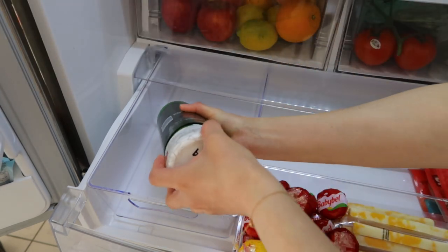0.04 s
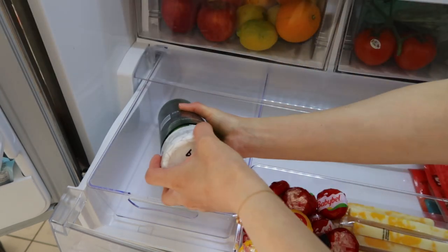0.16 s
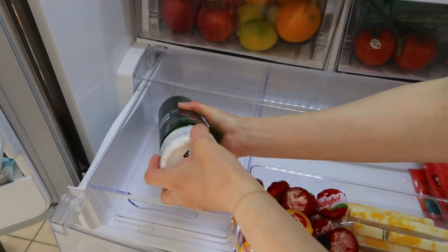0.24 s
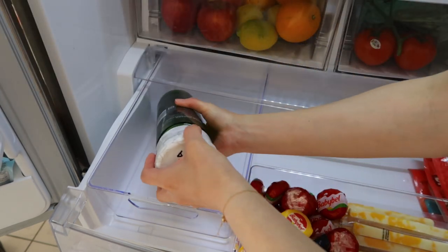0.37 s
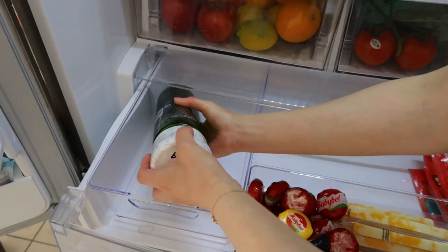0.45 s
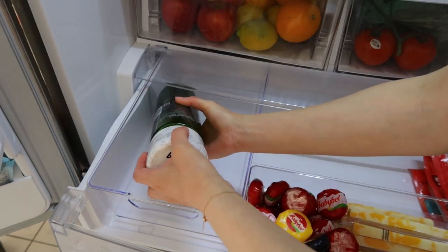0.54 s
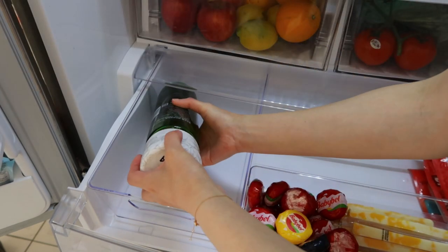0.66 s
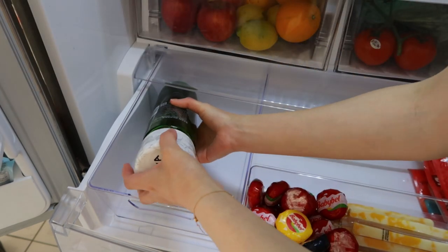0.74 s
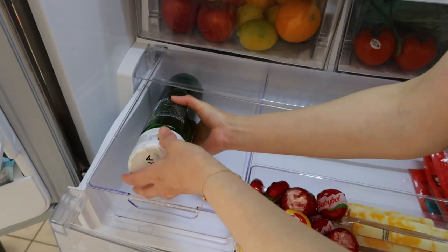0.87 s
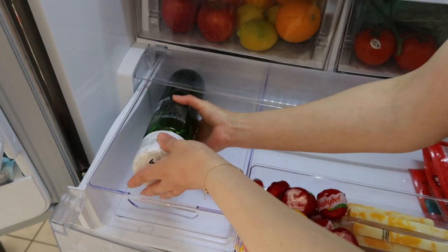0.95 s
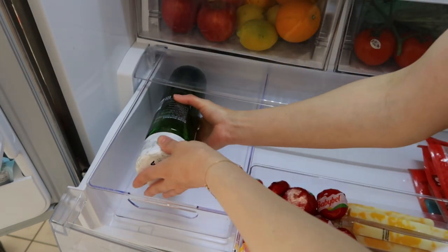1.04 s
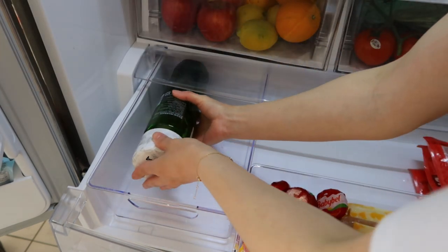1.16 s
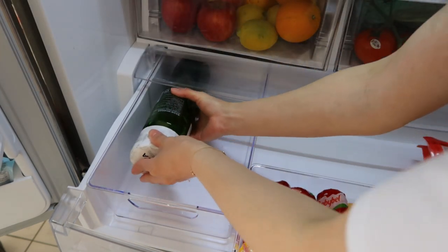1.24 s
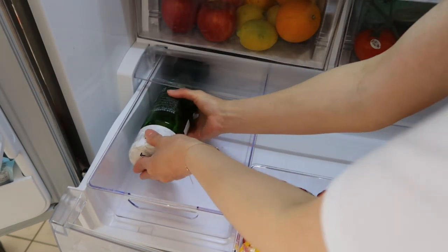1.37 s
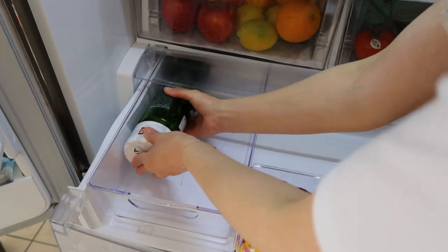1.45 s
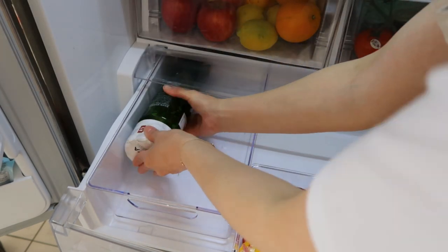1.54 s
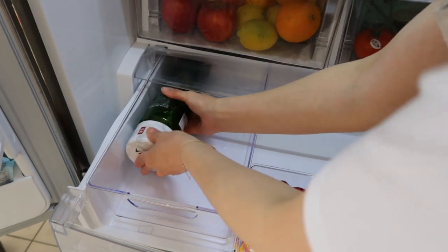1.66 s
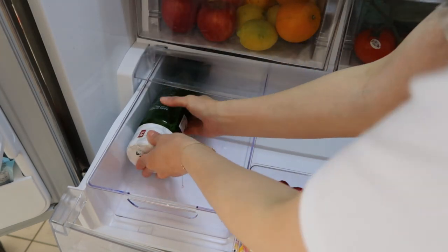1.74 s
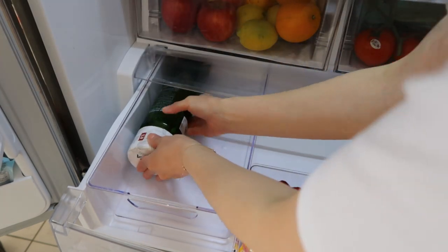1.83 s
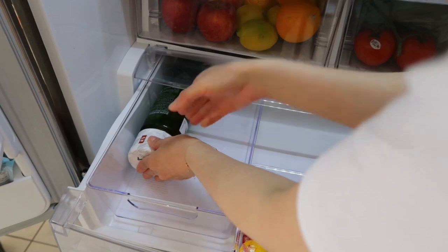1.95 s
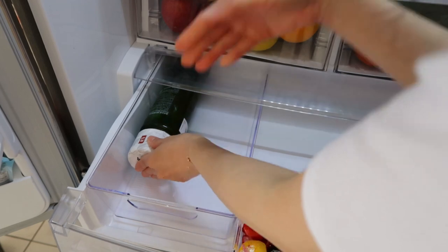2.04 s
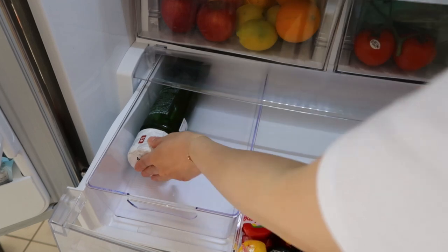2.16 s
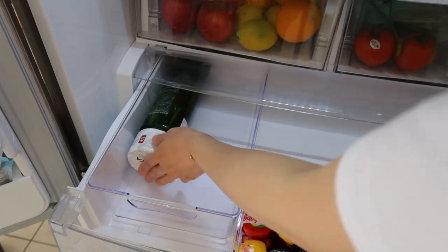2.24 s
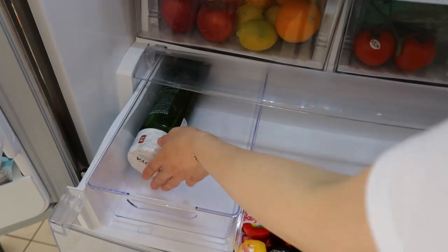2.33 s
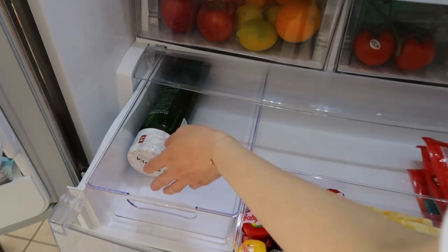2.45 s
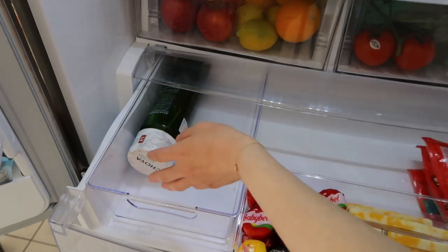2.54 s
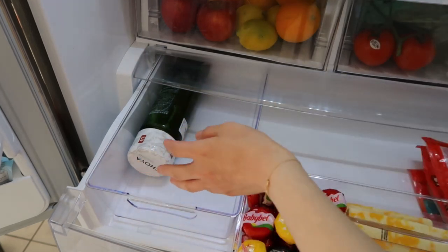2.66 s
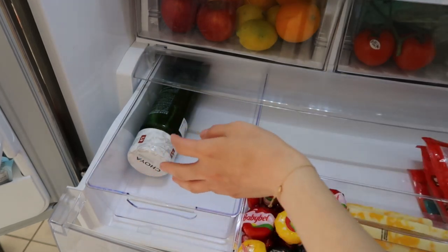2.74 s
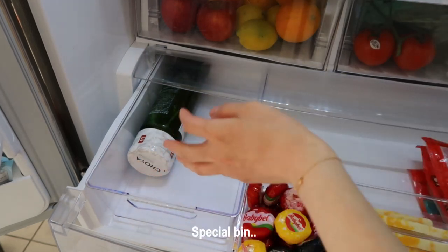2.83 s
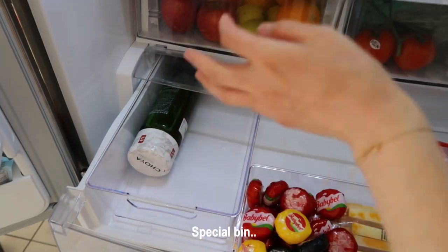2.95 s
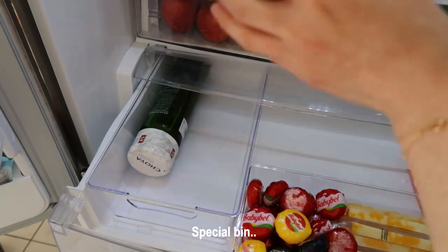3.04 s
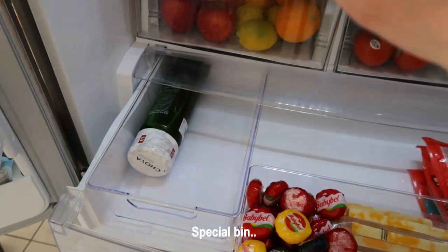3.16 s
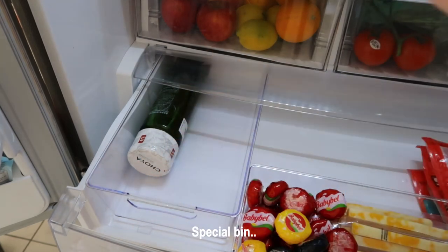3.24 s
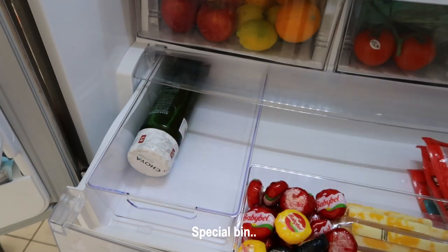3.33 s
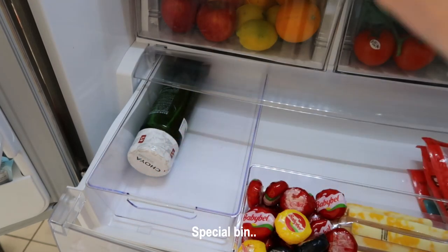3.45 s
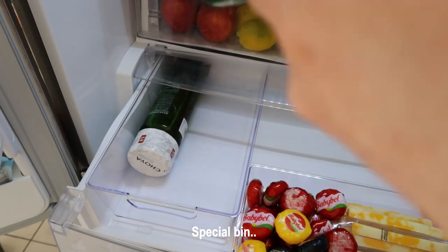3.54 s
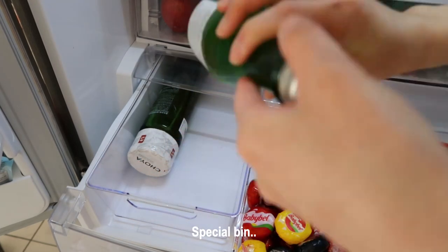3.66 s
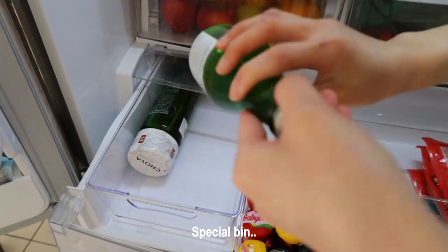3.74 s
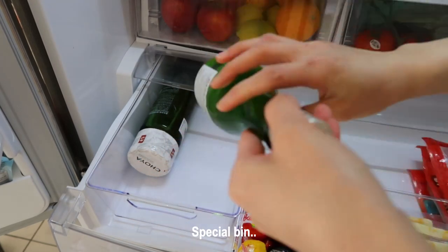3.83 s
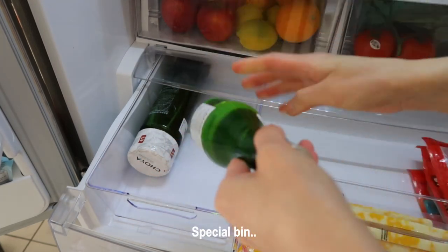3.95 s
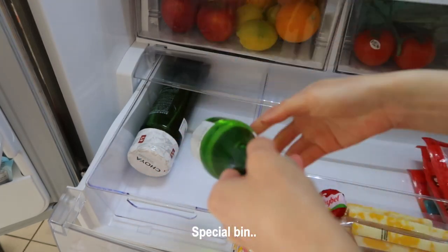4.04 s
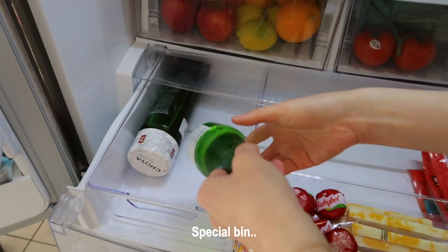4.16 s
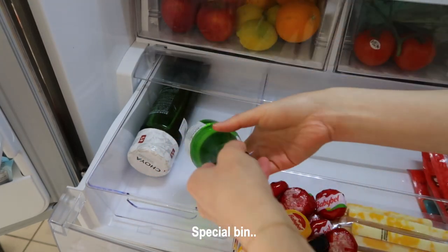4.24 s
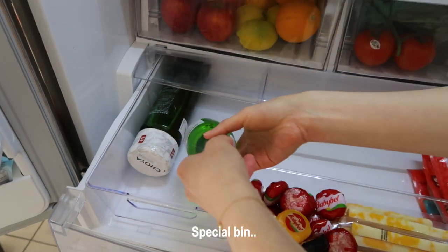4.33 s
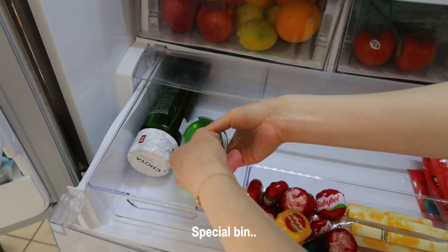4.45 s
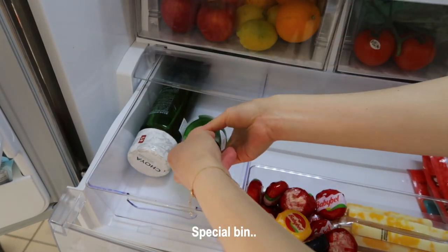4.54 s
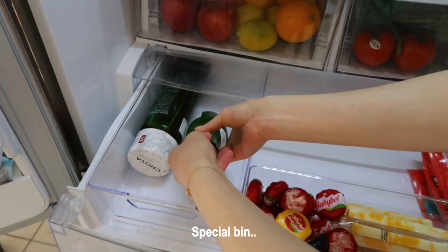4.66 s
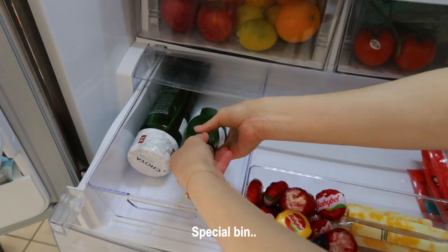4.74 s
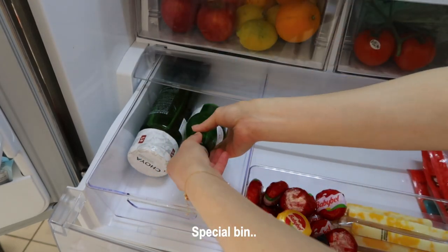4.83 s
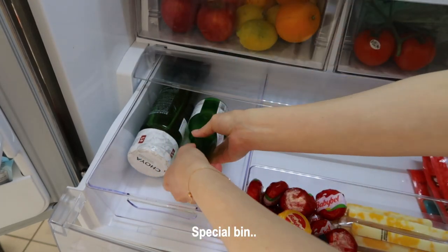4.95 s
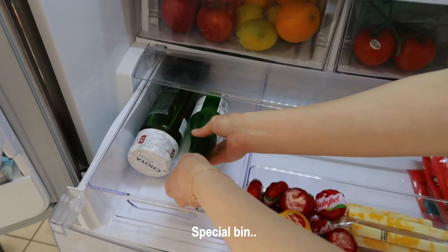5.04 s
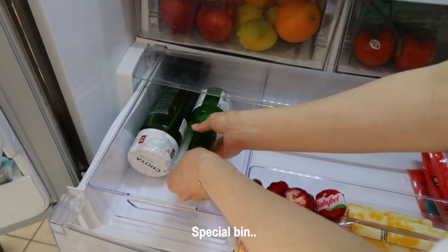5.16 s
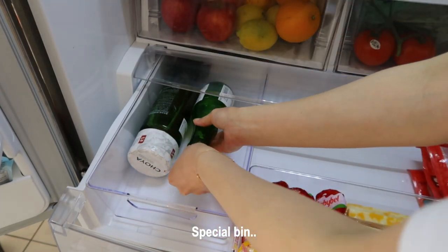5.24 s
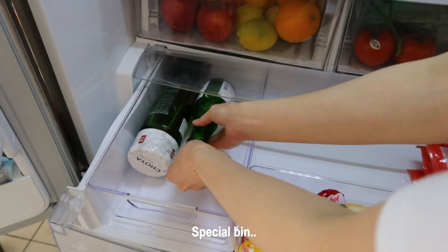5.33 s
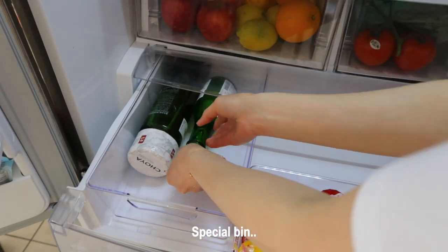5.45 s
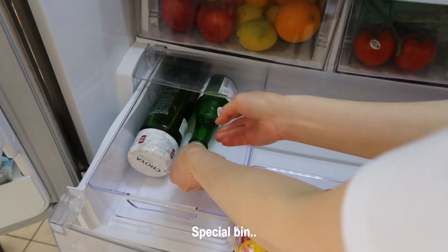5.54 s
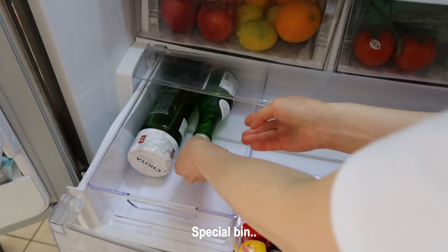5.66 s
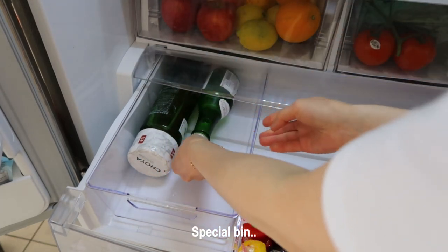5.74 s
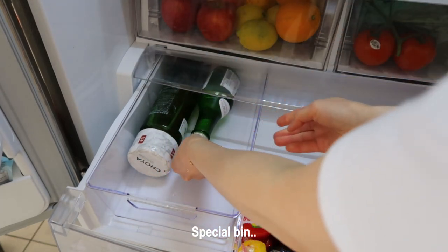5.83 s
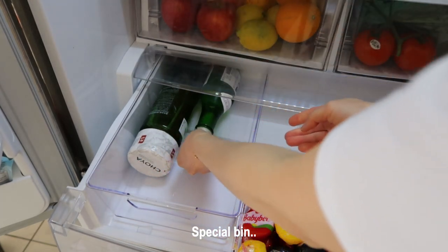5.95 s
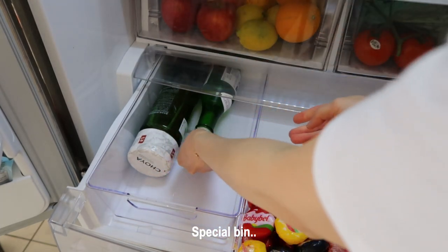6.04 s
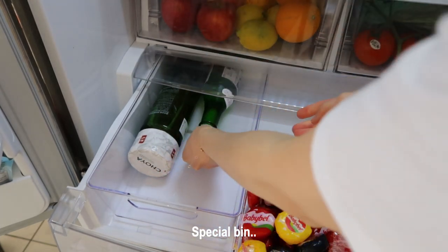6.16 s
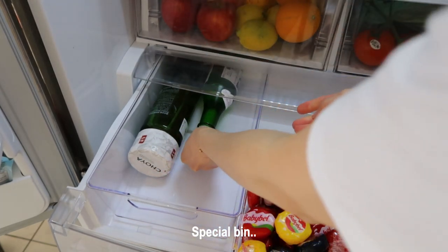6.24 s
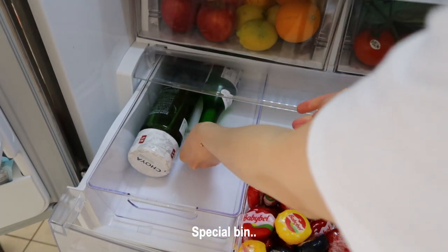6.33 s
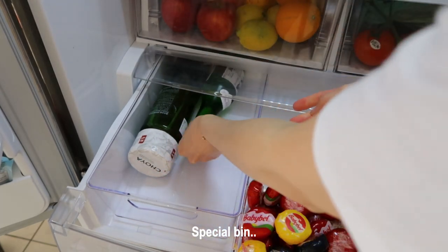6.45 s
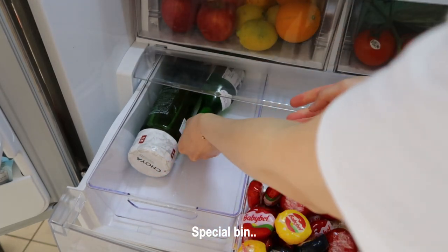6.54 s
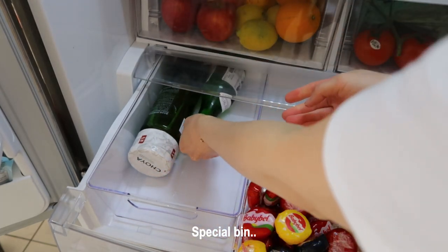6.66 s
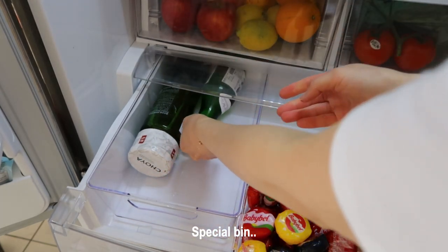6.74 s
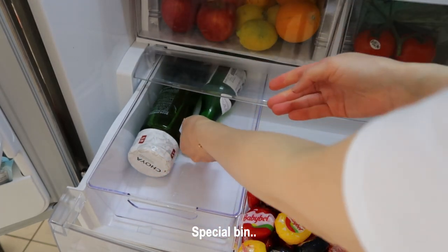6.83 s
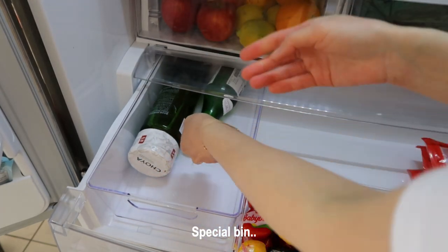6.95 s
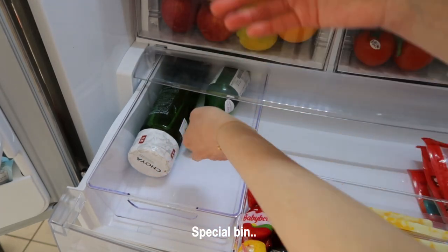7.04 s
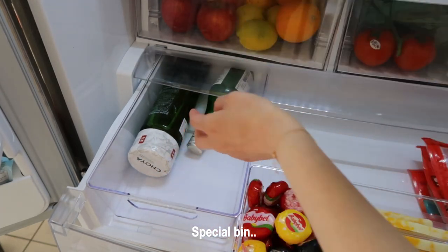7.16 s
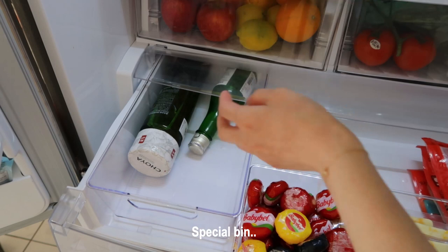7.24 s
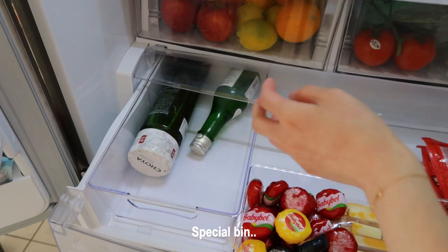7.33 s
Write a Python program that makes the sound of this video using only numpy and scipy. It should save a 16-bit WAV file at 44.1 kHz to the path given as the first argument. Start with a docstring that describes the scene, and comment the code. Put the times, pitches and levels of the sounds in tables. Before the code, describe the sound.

A full glass bottle knocks and chatters into the plastic drawer of an open fridge, settling with sharper hits and a small dry rasp. After a quiet pause, a second bottle lands with a short clank, shifts softly, then knocks firmly and clinks faintly on the first. Low rumble and slight rustling lie under it, with quiet room air. Close stereo microphone, short boxy tail.

```python
"""Two full glass bottles are laid into the plastic drawer of an open fridge, close to a small stereo camera.
From 0.3 s on, chattering knocks excite panel noise, damped drawer modes and a cabinet tail, with short tones.
At 2.5 s a label rasps (random clicks into resonances); at 4.85 s the second bottle lands with a clank of held
tones; at 6.6 s glass clinks on glass (struck modes). Low rumble, mid-band noise and rustling are shaped noise
under it all, as is the kitchen air, which sinks at 6.4 s; a thin, very high sine flickers in level."""
import sys
import numpy as np
from scipy import signal
from scipy.fft import rfft, irfft, next_fast_len
from scipy.io import wavfile
from scipy.ndimage import uniform_filter1d

SR = 44100
rng = np.random.default_rng(int(sys.argv[2]) if len(sys.argv) > 2 else 0)


def digitize_waveform(pressure):
    """Quantize a signal to 16-bit integers and store it at the path in sys.argv[1].

    Rows of a 2-D input are taken as channels; values are limited to [-1, 1].
    """
    field = np.atleast_2d(pressure).T
    bounded = np.clip(field, -1, 1)
    quanta = np.round(bounded * 32767).astype(np.int16)
    wavfile.write(sys.argv[1], SR, quanta)


N = 325899
TIME = np.arange(N) / SR
BANDS = 35 * 2 ** np.arange(0, 8.9, 1 / 2)  # half-octave centres, Hz
TINY = 1e-18  # keeps silent filter tails quick

# Glass on plastic. Each row: start in seconds, level in dB, brightness in dB per octave above the body,
# thump in dB.
KNOCKS = [(0.314, -15, -3.5, -12.5), (0.344, -19, -7.5, -14.0), (0.595, -19.5, -1, -5.5),
          (0.608, -20, -4, -22), (0.699, -20.5, -2.5, -5.5), (0.754, -22.5, -4.0, -5),
          (0.845, -34.5, -5.0, -25.0), (0.871, -22.5, -17.5, -47), (0.909, -44, -3, -2),
          (0.957, -17, -6.5, -15.5), (0.989, -21.5, -7.5, -14), (1.019, -28, -6.5, -5),
          (1.486, -20.5, -2.0, -6.5), (1.569, -11.5, -3.0, -24), (1.589, -13.5, -4.5, -11.5),
          (1.639, -26.5, -3, 1), (1.665, -26, -5.5, -20), (1.704, -18, -6, -3.5), (1.734, -30, -8, 0),
          (1.925, -34.5, -8, -10), (2.055, -13.5, -4.5, -10), (2.521, -62, 3.5, 4.5), (2.53, -44, -3.5, 3),
          (2.542, -33, -1.5, 7), (2.564, -30.5, -13, -19), (2.579, -32.5, -21, 1.5), (2.796, -62, 4, 23),
          (4.728, -43, -11, 5), (4.853, -13, -3.5, -13.5), (5.104, -44, -5.5, -2), (5.149, -44, -9, 1),
          (5.392, -44, -6.5, -23), (5.434, -28, -18.5, -14), (5.508, -40, -10.5, 0), (5.687, -28, -13, -14),
          (5.709, -33, -9.5, -8), (5.794, -33, -9.5, -2), (6.251, -9.5, -3.5, -8), (6.309, -16.5, -19, -18),
          (6.601, -26, -7, -44), (6.619, -25, -11.5, -14), (6.819, -10.5, -4, -18),
          (6.885, -18, -6.5, -13.5), (6.929, -27.5, -7, -10), (7.257, -51, -3, -12), (7.371, -45, -7, 7)]
# Spectrum of the knocks. Each row: frequency in Hz, relative level in dB per band.
KNOCK_COLOUR = [(45, -35), (80, -15.5), (160, -3.5), (320, -6.5), (640, 1), (1300, 0), (2600, 5.5),
                (5000, 1), (8000, -7.5), (12000, -4)]
# Decay of the drawer panels. Each row: frequency in Hz, time to fall 60 dB in seconds.
PANEL_T60 = [(60, 0.15), (160, 0.34), (420, 0.14), (1100, 0.16), (2900, 0.097), (7700, 0.088),
             (14000, 0.05)]
# Decay inside the cabinet. Each row: frequency in Hz, time to fall 60 dB in seconds.
CABINET_T60 = [(60, 0.24), (160, 0.47), (420, 0.6), (1100, 0.62), (2900, 0.46), (7700, .3)]
# Clear modes of the drawer. Each row: frequency in Hz, relative level in dB, time to fall 60 dB in seconds.
DRAWER_MODES = [(76.2, -2, 0.53), (96.6, 5, 0.26), (168.7, -6.5, 0.39), (222.8, -4, 0.42),
                (371.4, -0.5, 0.31), (425.7, -0.5, 0.16), (554, -0.5, 0.17), (658, -1.5, 0.25),
                (798, -4.5, 0.091), (883, -6.5, 0.26), (1016, -5.5, 0.103), (1155, 0, 0.15),
                (1556, 8, 0.095), (1806, -19.5, 0.063), (2397, 13, 0.018), (2810, -19.5, 0.16),
                (3140, 9, 0.065)]
# Single short tones, from low hums to very high, faint ticks. Each row: start in seconds, level in dB,
# frequency in Hz, held time in seconds.
SHORT_TONES = [(.318, -19.5, 560, 0.015), (0.358, -32.5, 75.2, 0.1), (.6, -15.5, 546, 0.025),
               (.6, -25.5, 390, 0.032), (.66, -34, 78.8, 0.068), (.755, -25.5, 649, .026),
               (1.05, -35, 197, 0.056), (1.087, -40, 1570, 0.005), (1.087, -43.5, 2880, .008),
               (1.088, -53, 4200, .008), (1.101, -44, 76, 0.11), (1.49, -25, 409, 0.036),
               (1.501, -30.5, 79, 0.14), (1.572, -17, 409, 0.02), (1.706, -20.5, 2020, 0.01),
               (1.719, -33, 95.4, 0.039), (2.057, -19.5, 2440, 0.0055), (2.057, -17.5, 520, 0.0059),
               (2.085, -34.5, 96, 0.058), (2.577, -31.5, 150, 0.0059), (3.465, -58, 3540, 0.016),
               (3.564, -55, 4600, 0.0097), (3.635, -60, 3680, .014), (4.857, -19, 600, 0.0053),
               (5.141, -43, 110, 0.032), (5.462, -30.5, 1040, 0.019), (5.594, -28.5, 658, 0.022),
               (5.962, -50.5, 10300, 0.0073), (5.962, -53, 11100, .008), (5.991, -37, 92.4, 0.067),
               (6.254, -20.5, 432, 0.02), (6.256, -20.5, 225, 0.027), (6.615, -28, 684, 0.0071),
               (6.821, -21, 510, .007), (6.822, -20, 2285, 0.0064), (7.372, -46.5, 600, .018)]
# Tones of the second bottle as it lands. Each row: frequency in Hz, level in dB, after-ring in dB re the tone.
CLANK = [(1502, -13, -23), (1440, -23.5, -17), (4600, -48, -7)]
# Glass on glass. Each row: start in seconds, level in dB.
CLINKS = [(6.601, -37.5)]
# Modes of a bottle wall. Each row: frequency in Hz, relative level in dB, time to fall 60 dB in seconds.
BOTTLE_MODES = [(1490, 1, 0.26), (2430, -16, 0.094), (2850, -8, 0.11), (3620, -6, .2), (3640, -10, 0.19),
                (4000, -11, 0.33), (4620, -4, 0.087), (4700, -13, 0.17), (5600, -9, 0.054),
                (6960, -14, 0.048)]
# Resonances of the rasp. Each row: frequency in Hz, relative level in dB, time to fall 60 dB in seconds.
RASP_MODES = [(2780, -12, .006), (3550, 0, 0.0082), (4600, -3.5, 0.0069), (6460, -14, .004)]
# Low rumble and mid-band noise under the knocks, swelling after several of them. Each row: time in seconds,
# rumble in dB, mid-band noise in dB, both before colouring.
UNDER_NOISE = [(0, -52.5, -55), (.33, -55, -55), (.51, -39.5, -44), (.9, -47, -41), (1.25, -52.5, -48),
               (1.58, -48, -55), (1.67, -50, -25), (1.75, -46.5, -51.5), (2.32, -49.5, -56),
               (3.38, -56.5, -55.5), (4.75, -63.5, -58.5), (4.98, -47, -47.5), (5.5, -55, -49.5),
               (6.0, -48, -53.5), (6.25, -53, -50), (6.4, -54, -43), (6.55, -51, -56), (6.95, -51.5, -59),
               (7.1, -71, -63)]
# Spectrum of rumble, mid-band noise and rustle. Each row: frequency in Hz, relative level in dB per band.
UNDER_COLOUR = [(35, -25), (80, -8.5), (250, -18.5), (500, -11), (1500, -19.5), (3000, -9.5), (7000, -20.5),
                (12000, -18)]
# Skin and sleeve rustling. Each row: start of the hold in seconds, held time in seconds,
# level in dB before colouring.
RUSTLE = [(1.62, 0.067, -52), (2.78, .27, -57.5), (5.97, .24, -64)]
# Spectrum of the room air. Each row: frequency in Hz, relative level in dB per Hz.
ROOM = [(25, 13), (40, 5), (70, -16.5), (100, -8.5), (180, -4), (290, -11), (440, -11.5), (750, -23),
        (1400, -19), (3200, -22.5), (6000, -29.5), (9000, -34), (13000, -41)]
# Stereo width of sounds from the drawer. Each row: frequency in Hz, side minus mid in dB.
NEAR_WIDTH = [(60, -28.5), (110, -57), (200, -62), (380, -21), (700, -25.5), (1290, -14.5), (2380, -13.5),
              (4400, -7), (8120, 1), (15000, 3.5)]
# Stereo width of sounds from all around. Each row: frequency in Hz, side minus mid in dB.
FAR_WIDTH = [(60, -15), (110, -19.5), (200, -3), (380, 3), (700, 7), (1290, 5), (2380, -0.5), (4400, 3.5),
             (8120, -2.5), (15000, 16)]

CHATTER_S, CHATTER_FALL_DB = 0.016, -14  # span of the re-contacts and their fall over it
LEAD_DB = 2.5  # the first contact stands out from the chatter
THUMP_HZ, BODY_HZ, CRACK_HZ = 104.5, 521, 7740  # brightness tilts the bands from body to crack
SNAP_DB, HARDNESS = 0, 0.41  # a heavier blow is a harder contact: dB of snap per dB of blow
BURST_DB, BURST_T60_S = 1.5, 0.026  # the first instant of a knock is louder and dies fast
RATTLE_DB = 1.5  # unevenness of the panel decay
CABINET_DB = -14.5

AFTER_DB = -14.5  # after-ring relative to its tone
AFTER_T60_S, AFTER_SLOPE = 0.27, -0.56  # at the body pitch; shorter for higher tones by this power
DAMP_CYCLES, DAMP_S = 2.6, 0.0027  # both add to the time in which a held tone is damped
WAVER, CLANK_WAVER = 0.14, 0.092  # share by which a held tone wavers
CLANK_S, CLANK_HELD_S, CLANK_T60_S, CLANK_DAMP_S = 4.852, 0.056, 0.62, 0.0037

RASP_S, RASP_HELD_S, RASP_EDGE_S, RASP_DB = 2.535, 0.033, 0.018, -39.5
RUSTLE_RISE_S, RUSTLE_FALL_S, RUSTLE_REST_DB = 0.023, 0.044, -70.5

ROOM_DB = -51.5  # air rms, before the sinking and the low-pass
HIGH_TONE_HZ, HIGH_TONE_DB = 13020, -73.5
SINK_S, SINK_LENGTH_S, SINK_DB = 6.4, 0.12, -5  # the air sinks towards the end
AIR_TOP_HZ = 13200
BASS_HZ, DROOP_HZ, TOP_HZ = 37.0, 12100, 15800
SQUASH = 0.6


def knocks(near):
    """Impact excitation: panel vibration, contact snap and cabinet tail by band, plus the drawer's modes."""
    places, share = chatter()
    _, level, brightness, thump = np.array(KNOCKS).T
    hardness = undb(SNAP_DB + HARDNESS * level[:, None]) ** 2
    out = 0
    for hz, noise in zip(BANDS, near):
        power = blow_power(hz, 0.59 * share, places)
        # powers decay twice as fast as amplitudes
        burst = undb(BURST_DB) ** 2 * fade(power, BURST_T60_S / 2)
        panel = fade(power, on_log(PANEL_T60, hz) / 2) + burst
        # the tail builds up as the panels radiate
        tail = fade(power, on_log(CABINET_T60, hz) / 2) - fade(power, 0.051)
        total = panel + undb(CABINET_DB) ** 2 * np.abs(tail)
        rise = int(0.6 * SR / hz + 0.00076 * SR)  # lows come late
        envelope = np.sqrt(uniform_filter1d(total, rise, origin=(rise - 1) // 2).clip(0))
        vibration = undb(-7.0) * flicker(count=90, db=RATTLE_DB) * envelope * noise
        contact = np.sqrt(blow_power(hz, hardness * share, places))
        snap = mode(contact, hz, 11.0 / hz)  # falls 60 dB in 11 cycles
        out = out + undb(on_log(KNOCK_COLOUR, hz)) * (vibration + snap)
    for hz, db, t60 in DRAWER_MODES:
        # each contact point reaches the mode with its own strength and sign
        reach = rng.standard_normal(share.shape)
        push = blow_power(hz, reach * share, places)
        force = np.sign(push) * np.sqrt(np.abs(push))
        out = out + undb(db - 9.0) * mode(force, hz, t60)
    return out


def chatter(count=6):
    """Repeated impact: a blow and quick, on average weaker re-contacts, as sample places and power shares."""
    starts = np.array(KNOCKS)[:, :1]
    luck = rng.random((len(KNOCKS), 2 * count))
    order = np.arange(count)
    steps = (order + luck[:, :count] * (order > 0)) / count
    places = ((starts + CHATTER_S * steps) * SR).astype(int)
    fall_db = CHATTER_FALL_DB * steps + LEAD_DB * (steps == 0)
    share = (0.22 + luck[:, count:]) * undb(2 * fall_db)  # doubled dB: a power
    return np.clip(places, 0, N - 1), share / share.sum(axis=1, keepdims=True)


def blow_power(hz, weight, places):
    """Spectral tilt of an impact: weighted contact powers at one frequency, placed along time."""
    _, level, brightness, thump = np.array(KNOCKS).T
    octaves = np.log2(np.clip(hz, THUMP_HZ, CRACK_HZ) / BODY_HZ)
    if octaves > 0:
        db = level + brightness * octaves
    else:
        db = level + thump * octaves / np.log2(THUMP_HZ / BODY_HZ)
    power = weight * undb(db)[:, None] ** 2
    return np.bincount(places.ravel(), power.ravel(), N)


def short_tones():
    """Decay that shortens with frequency: the after-rings of low tones outlast those of high ones."""
    out = 0
    for s, db, hz, held in SHORT_TONES:
        t60 = AFTER_T60_S * (hz / BODY_HZ) ** AFTER_SLOPE
        out = out + ring(s, db, hz, held, AFTER_DB, t60, WAVER, DAMP_S + DAMP_CYCLES / hz)
    return out


def clank():
    """Inharmonic tones of the second bottle as it lands, sharing one hold and one decay time."""
    return sum(ring(CLANK_S, db, hz, CLANK_HELD_S, after_db, CLANK_T60_S, CLANK_WAVER, CLANK_DAMP_S)
               for hz, db, after_db in CLANK)


def ring(s, db, hz, held, after_db, t60, waver, damp):
    """Damped tone: it builds up, holds and is damped, over a beating, decaying after-ring."""
    start = int(s * SR)
    t = np.arange(min(int(0.6 * SR), N - start)) / SR
    since_release = np.clip(t - held, 0, 1)
    build_up = 0.51 / hz + 0.0014  # seconds
    hold = np.clip(t / build_up, 0, 1) * np.exp(-since_release / damp)
    after = undb(after_db - 60 * since_release / t60) * np.clip(t / held, 0, 1)
    smooth = int(5.0 * SR / hz ** 0.5 / 10) + 1  # the wavering is quicker on high tones
    slow, beat = uniform_filter1d(rng.standard_normal((2, len(t))), smooth) * np.sqrt(smooth)
    in_phase = hold * (1 + waver * slow) + after * (0.28 + 0.98 * slow)
    turn = 2 * np.pi * hz * t
    out = np.zeros(N)
    out[start:start + len(t)] = undb(db) * (in_phase * np.sin(turn) + after * beat * np.cos(turn))
    return out


def clinks():
    """Modal ringing of a thin bottle wall, unsettled by the liquid inside."""
    taps = np.zeros(N)
    for s, db in CLINKS:
        taps[int(s * SR)] = undb(db)
    return sum(undb(db) * flicker(count=70, db=3.5) * mode(taps, hz, t60) for hz, db, t60 in BOTTLE_MODES)


def rasp():
    """Stick-slip as a label rasps over the plastic: dense uneven clicks excite short resonances."""
    edges = [-RASP_EDGE_S, 0, RASP_HELD_S, RASP_HELD_S + RASP_EDGE_S]
    gate = np.interp(TIME - RASP_S, edges, [0, 1, 1, 0])
    slips = rng.random(N) < 1500 / SR  # 1500 a second on average
    clicks = slips * rng.standard_normal(N) * gate
    return undb(RASP_DB) * sum(undb(db) * mode(clicks, hz, t60) for hz, db, t60 in RASP_MODES)


def under_noise(near, far):
    """Modulated band noise: low rumble and mid-band noise under the knocks, and a rustle above them in pitch."""
    rumble, middle = curves(UNDER_NOISE)
    rustle = rustling()
    out = 0
    for hz, close, wide in zip(BANDS, near, far):
        if hz < 280:
            sound = rumble * close
        elif hz < 2000:
            sound = middle * close
        else:
            sound = rustle * wide
        out = out + undb(on_log(UNDER_COLOUR, hz)) * flicker(count=12, db=5.5) * sound
    return flicker(count=60, db=1.93) * out


def rustling():
    """Amplitude envelope: each rustle swells, holds and fades over a faint constant level."""
    gain = undb(RUSTLE_REST_DB)
    for s, held, db in RUSTLE:
        edges = [-RUSTLE_RISE_S, 0, held, held + RUSTLE_FALL_S]
        gain = gain + undb(db) * np.interp(TIME - s, edges, [0, 1, 1, 0])
    return gain


def kitchen(far):
    """Stationary noise: fridge and room air, steady until it sinks."""
    # a half-octave band widens with its frequency, hence the root
    air = sum(undb(on_log(ROOM, hz)) * np.sqrt(hz) * noise for hz, noise in zip(BANDS, far))
    sink_db = SINK_DB * np.clip((TIME - SINK_S) / SINK_LENGTH_S, 0, 1)
    return air * undb(ROOM_DB + sink_db) / air.std()


def high_tone():
    """Amplitude modulation of a sine: a thin, steady, very high tone, its level flickered at random."""
    return undb(HIGH_TONE_DB) * flicker(count=40, db=5.5) * np.sin(2 * np.pi * HIGH_TONE_HZ * TIME)


def undb(db):
    """The decibel law for amplitudes, inverted."""
    return 10 ** (np.asarray(db) / 20)


def on_log(table, hz):
    """Interpolation of a (Hz, value) table on a log-frequency axis."""
    f, v = np.transpose(table)
    return np.interp(np.log(hz), np.log(f), v)


def curves(table):
    """Linear interpolation of gains along time, one for each dB column."""
    s, *columns = np.transpose(table)
    return [np.interp(TIME, s, undb(db)) for db in columns]


def flicker(count, db):
    """Random amplitude modulation: a gain wanders between random levels, count times a second."""
    steps = int(N / SR * count) + 2
    return np.interp(TIME * count, np.arange(steps), undb(db * rng.standard_normal(steps)))


def fade(x, t60):
    """Exponential decay: every sample starts one that falls 60 dB in amplitude in t60 seconds."""
    return signal.lfilter([1], [1, -np.exp(-np.log(1000) / (t60 * SR))], x + TINY)


def mode(x, hz, t60):
    """A damped resonance; a unit impulse starts a ring of amplitude 1."""
    r = np.exp(-np.log(1000) / (t60 * SR))
    w = 2 * np.pi * hz / SR
    return signal.lfilter([0, r * np.sin(w)], [1, -2 * r * np.cos(w), r * r], x + TINY)


def band_noise():
    """Filtered white noise: a (mid, side) pair for each band, its mid of rms 1."""
    size = next_fast_len(N)
    f = np.fft.rfftfreq(size, 1 / SR) + 1  # +1 Hz avoids the log of zero
    white = rfft(rng.standard_normal((2, size)))
    out = []
    for hz in BANDS:
        shape = np.cos(np.pi * np.clip(np.log2(f / hz), -0.5, 0.5))
        pair = irfft(white * shape, size)[:, :N]
        out.append(pair / pair[0].std())
    return out


def spread(bands, width, order):
    """Mid-side stereo: left and right noise by band; every order starts elsewhere in the noise."""
    out = []
    for hz, pair in zip(BANDS, bands):
        mid, side = np.roll(pair, order * N // 4, axis=1)
        side = side * undb(on_log(width, hz))
        out.append(np.array([mid + side, mid - side]))
    return out


def scene():
    """Superposition of the knocks, tones and rasp with the low-passed quiet sounds."""
    bands = band_noise()
    under = under_noise(spread(bands, NEAR_WIDTH, order=1), spread(bands, FAR_WIDTH, order=2))
    quiet = under + kitchen(spread(bands, FAR_WIDTH, order=3)) + high_tone()
    quiet = signal.sosfilt(signal.ellip(6, 0.5, 50, AIR_TOP_HZ, fs=SR, output="sos"), quiet)
    struck = knocks(spread(bands, NEAR_WIDTH, order=0))
    return struck + short_tones() + clank() + clinks() + rasp() + quiet


def record(dry):
    """Saturation and band limits: the camera rounds peaks, loses deep bass, droops on top and cuts off."""
    wet = np.tanh(SQUASH * dry) / SQUASH
    wet = signal.sosfilt(signal.butter(4, BASS_HZ, "high", fs=SR, output="sos"), wet)
    wet = signal.sosfilt(signal.butter(4, DROOP_HZ, fs=SR, output="sos"), wet)
    return signal.sosfilt(signal.ellip(8, 0.2, 70, TOP_HZ, fs=SR, output="sos"), wet)


dry = scene()
out = record(dry)
digitize_waveform(out)
```